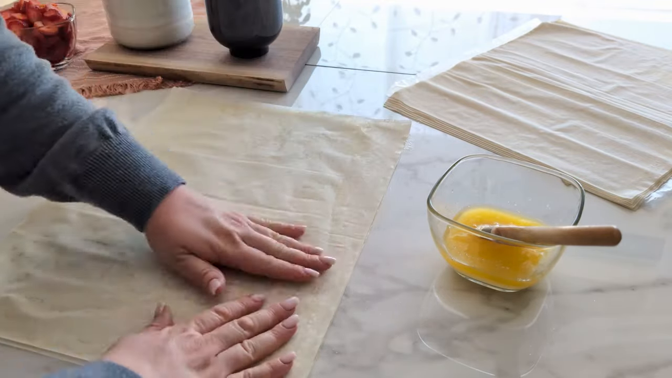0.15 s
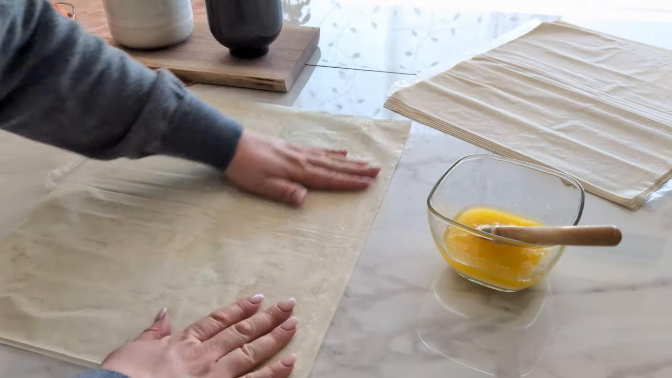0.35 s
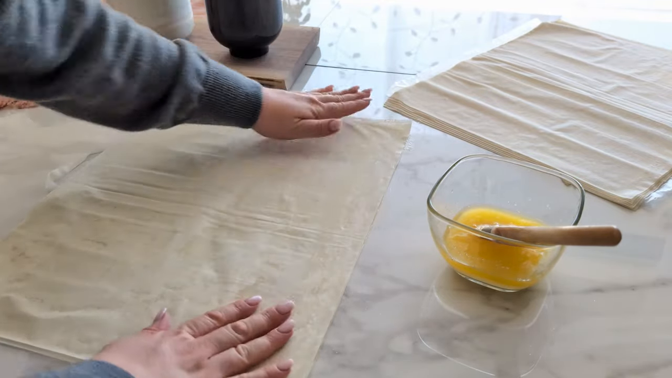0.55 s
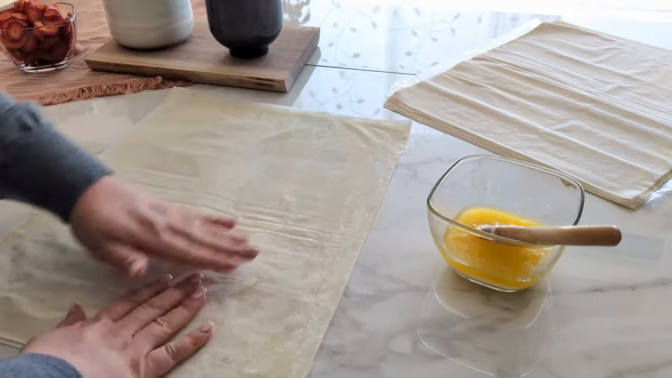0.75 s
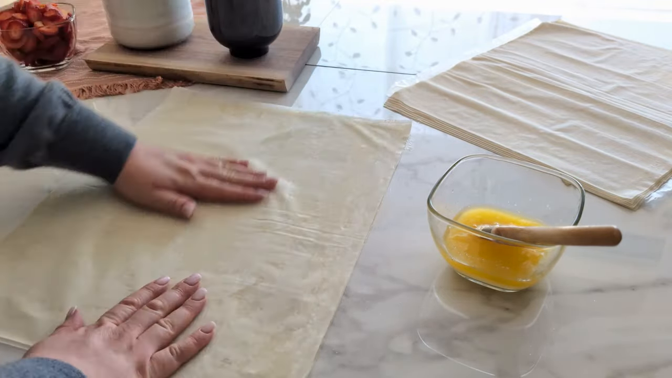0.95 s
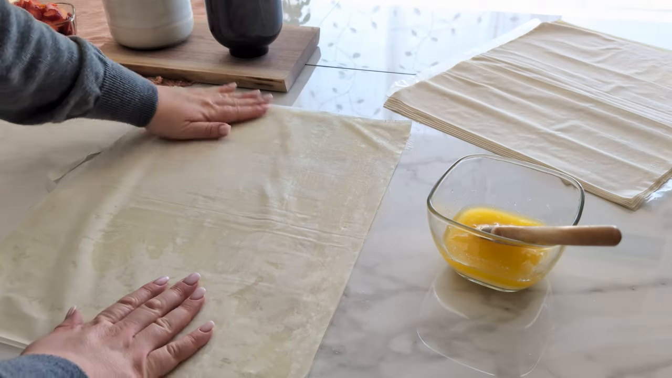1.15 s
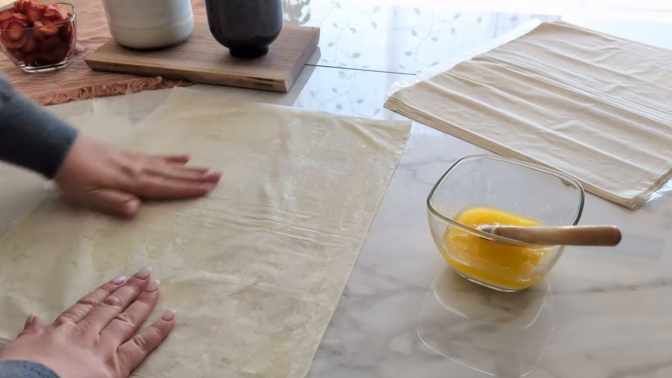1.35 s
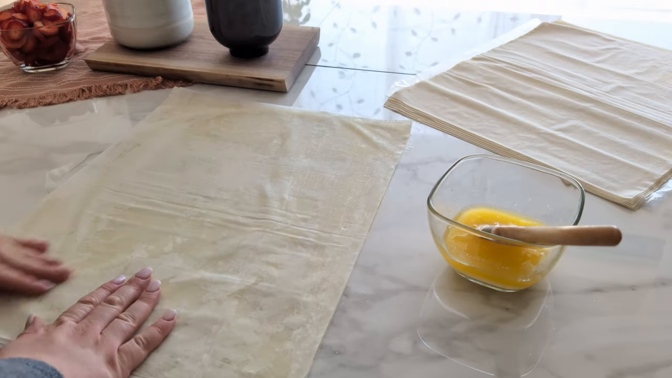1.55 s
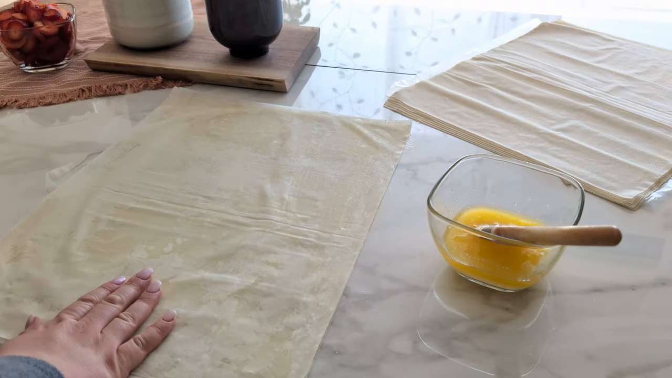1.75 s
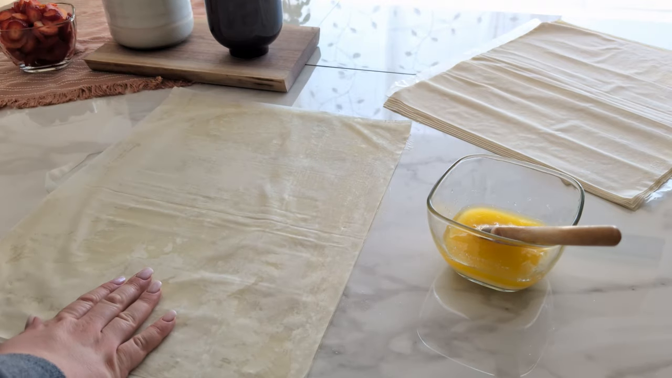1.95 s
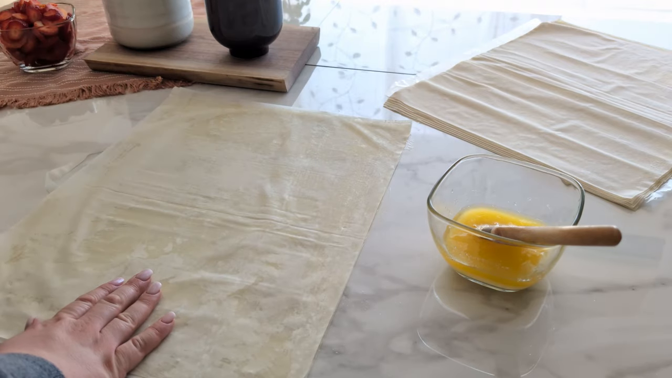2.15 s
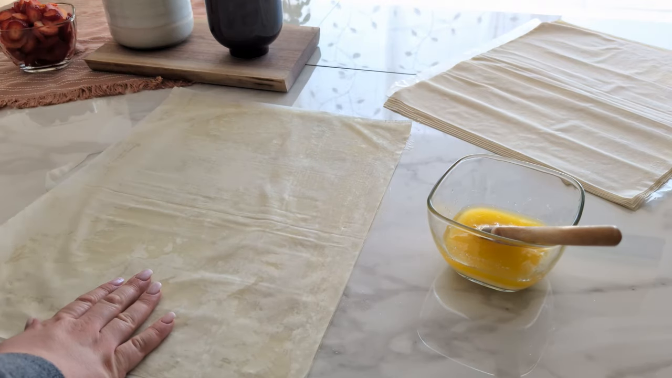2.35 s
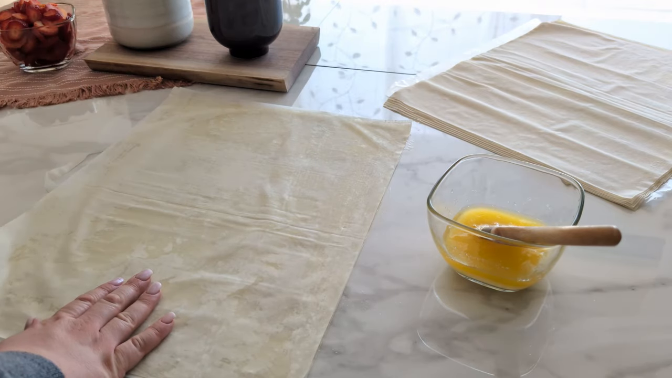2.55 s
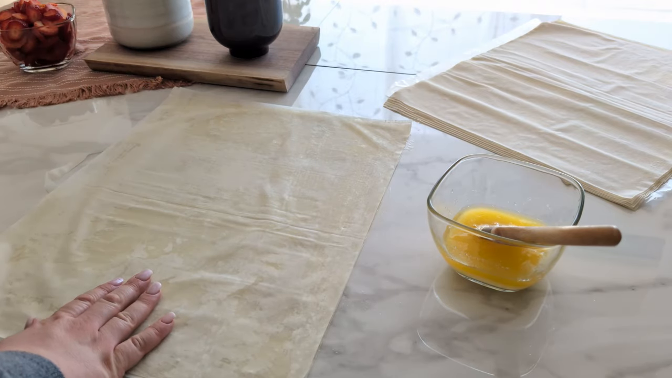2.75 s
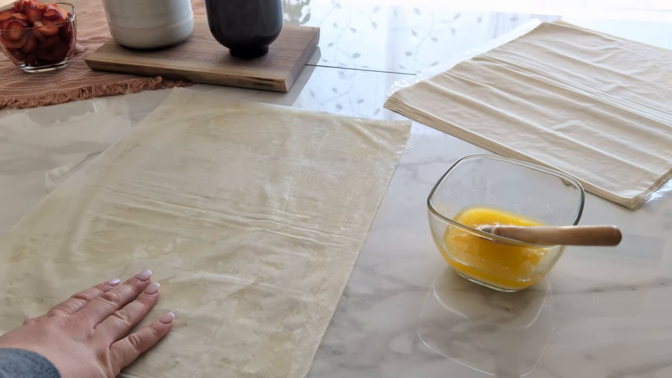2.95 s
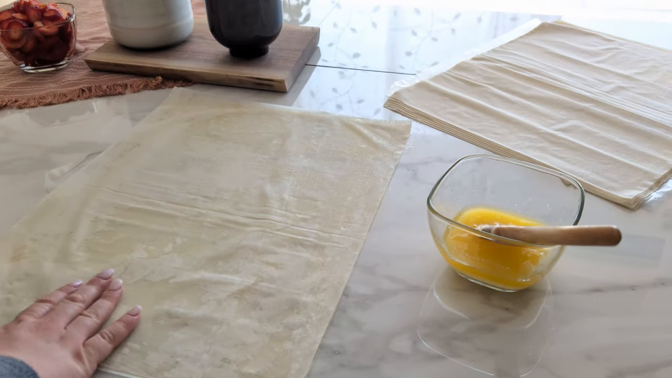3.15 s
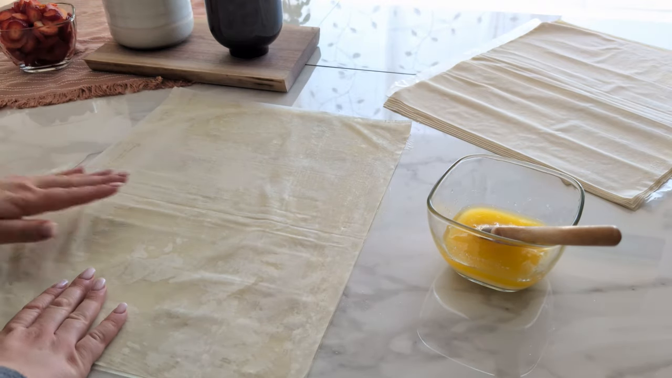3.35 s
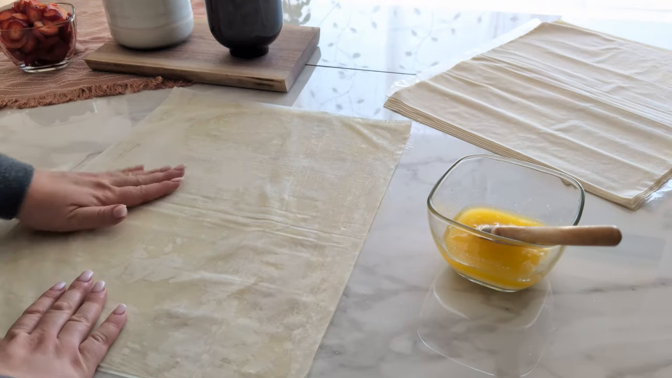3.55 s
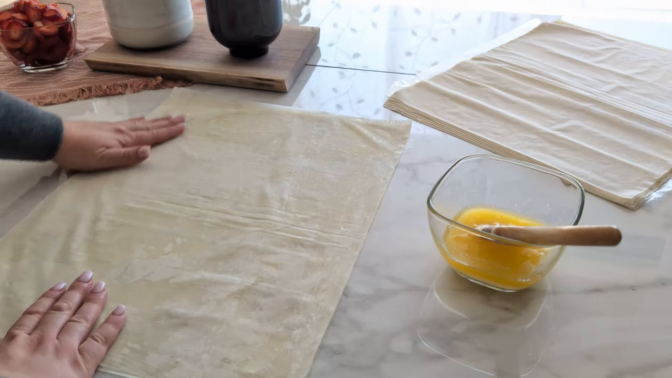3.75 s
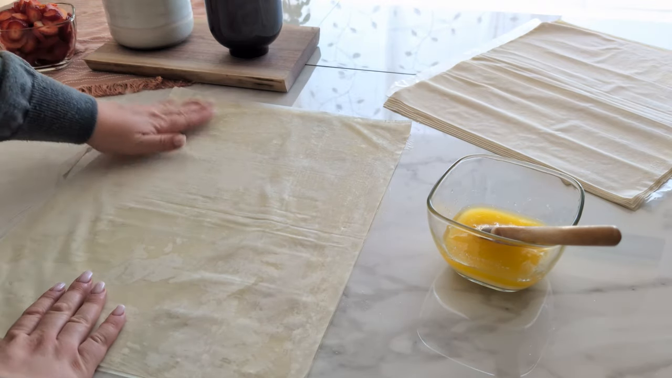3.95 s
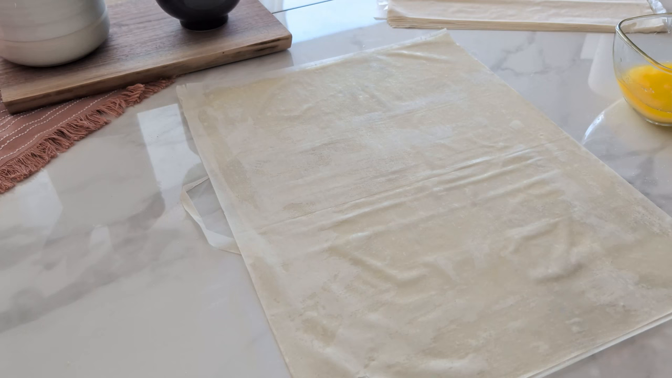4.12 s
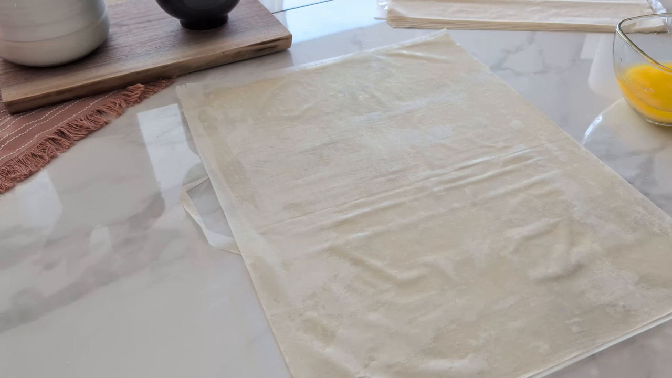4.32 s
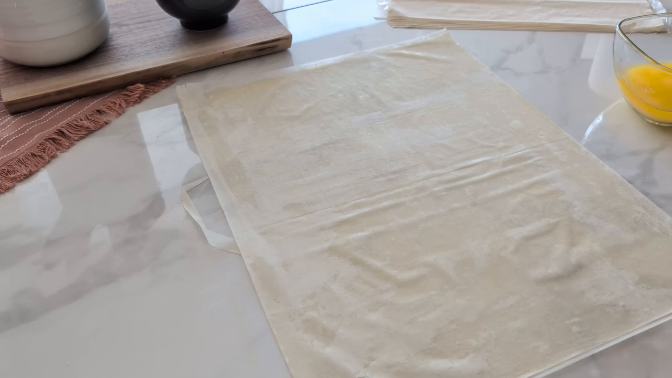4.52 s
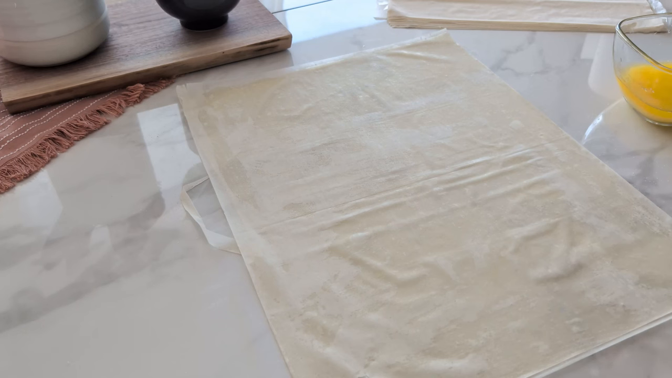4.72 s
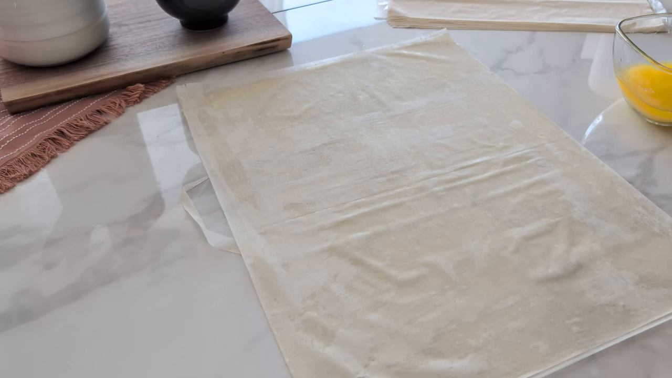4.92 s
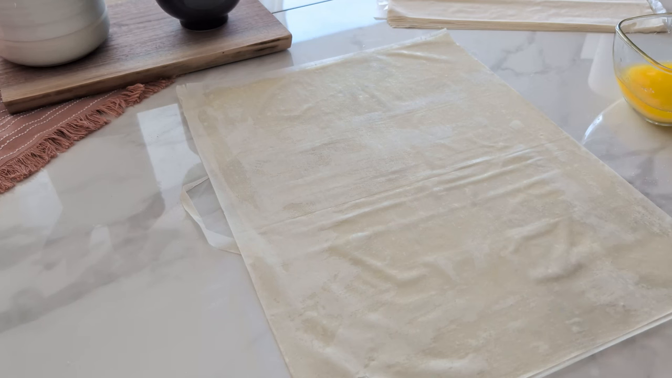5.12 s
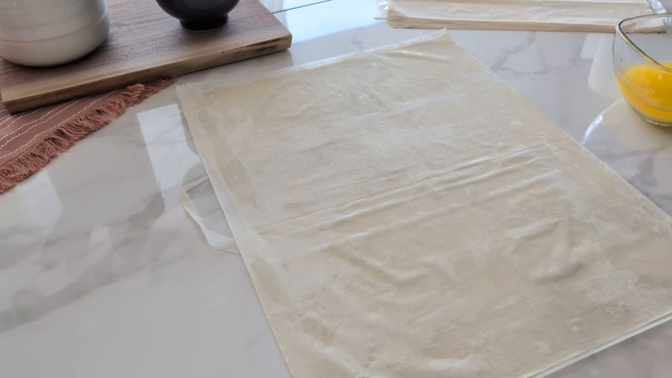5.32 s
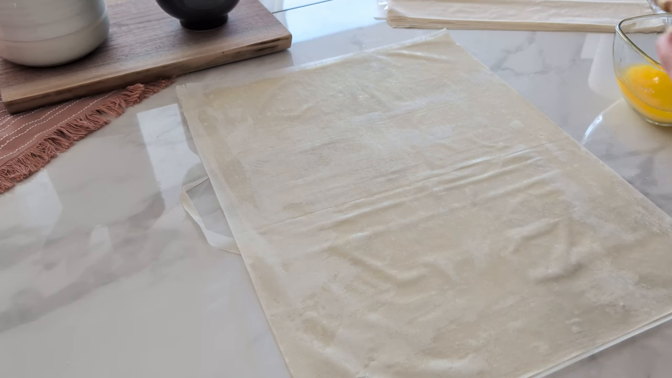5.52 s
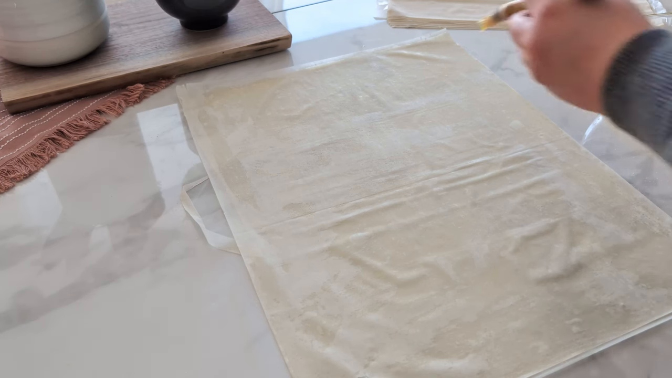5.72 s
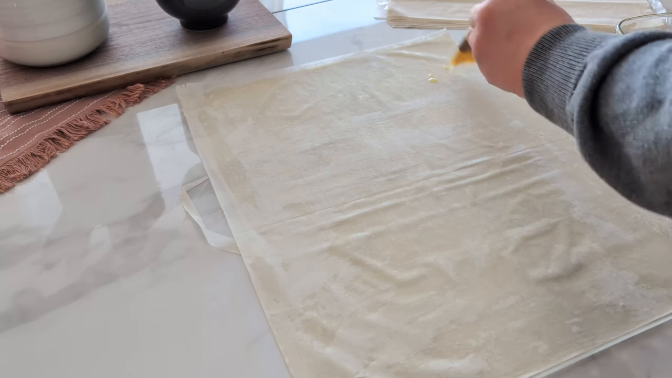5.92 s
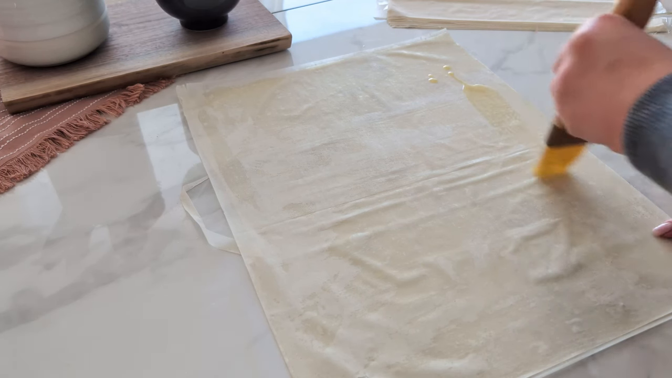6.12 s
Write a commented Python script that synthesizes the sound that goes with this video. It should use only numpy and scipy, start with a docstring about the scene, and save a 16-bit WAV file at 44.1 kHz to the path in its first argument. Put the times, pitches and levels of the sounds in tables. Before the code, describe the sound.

A palm makes soft dry hissing slides over a thin pastry sheet in a quiet kitchen; a distant door thuds, then thick liquid gurgles.

```python
"""Palm on pastry, then a butter brush

A palm smooths a thin pastry sheet on a stone counter in a quiet kitchen, and the sheet settles.
A door thuds far away: a resonant boom and a clatter, both of decaying noise.
After a cut a brush is lifted from a glass bowl of melted butter and makes a first stroke: rising rings
gurgle and bowl modes tick. Slides, settling and faint butter spray are bursts of hiss in two bands.
A low rumble, mains hum and an outdoor wash lie under everything."""
import sys
import numpy as np
from scipy import signal
from scipy.io import wavfile
from scipy.ndimage import uniform_filter1d

SR = 44100
rng = np.random.default_rng(int(sys.argv[2]) if len(sys.argv) > 2 else 0)


def to_wav(s):
    """Save 16-bit WAV."""
    ch = np.atleast_2d(s).T  # columns
    pcm = np.round(np.clip(ch, -1, 1) * 32767)  # PCM
    wavfile.write(sys.argv[1], SR, pcm.astype(np.int16))


N = 276948


def gain_of(db):
    """Decibels to gain."""
    return 10 ** (np.asarray(db) / 20)


def evened(x):
    """Scales to rms 1."""
    return x / np.sqrt(np.mean(x ** 2) + 1e-20)


def read(points, hz):
    """Reads a table over log frequency."""
    f, value = np.transpose(points)
    return np.interp(np.log(hz + 1), np.log(f + 1), value)


def colour(points):
    """A spectrum table as a function of frequency."""
    return lambda hz: read(points, hz)


def sides(pan_db):
    """Left and right gain."""
    return gain_of([pan_db / 2, -pan_db / 2])


def played(level_rows, sound):
    """A sound under a level curve, silent outside it."""
    time_s, level_db = np.transpose(level_rows)
    at = np.arange(round(time_s[0] * SR), min(round(time_s[-1] * SR), N))
    out = np.zeros((2, N))
    out[:, at] = gain_of(np.interp(at / SR, time_s, level_db)) * sound[:, at]
    return out


# Left-right likeness of noise: freq_hz, correlation [-1 to 1]
CHANNEL_LIKENESS = [(60, 0.9), (150, 0.97), (380, 0.69), (950, -0.29), (2380, -0.031), (5980, -0.045),
                    (15000, 0.098)]


def noise(spectrum_db, patchy_db, flicker_db, ripple_db, size, count=N):
    """Two-channel noise with drifting patches, a common flicker and the fixed ripple of room modes."""
    frames, hz = 4 * count // size + 5, np.fft.rfftfreq(size, 1 / SR)
    a, b, c, d, patches = rng.standard_normal((frames, len(hz), 5)).T
    patches = uniform_filter1d(patches, size=size // 64, axis=0)  # over frequency
    patches = evened(uniform_filter1d(patches, size=16384 // size, axis=1))  # over time
    flicker = evened(uniform_filter1d(rng.standard_normal(frames), size=3))
    ripple = rng.standard_normal((len(hz), 1))
    same = np.clip(read(CHANNEL_LIKENESS, hz), -1, 1)[:, None]
    left = a + 1j * b
    right = same * left + np.sqrt(1 - same ** 2) * (c + 1j * d)
    level_db = spectrum_db(hz)[:, None] + patchy_db * patches + flicker_db * flicker + ripple_db * ripple
    z = np.array([left, right]) * gain_of(level_db)
    return evened(signal.istft(z, nperseg=size, noverlap=3 * size // 4)[1][:, :count])


# Rumble spectrum: freq_hz, density_db [dB per Hz, relative]
RUMBLE_SPECTRUM = [(21, -40), (35, -13.5), (48, -3), (70, 0.5), (97, -5), (113, -28), (130, -8.5),
                   (160, -17.5), (210, -57), (350, -120)]
# Rumble level: time_s, level_db [rms]
RUMBLE_CURVE = [(0.0, -52.5), (1.0, -53), (3.0, -54), (4.11, -54), (5.9, -53), (6.28, -53)]


def rumble():
    """Nearly steady low noise."""
    low = noise(colour(RUMBLE_SPECTRUM), patchy_db=0.37, flicker_db=-1.7, ripple_db=0.9, size=4096)
    return played(RUMBLE_CURVE, low)


# Outdoor wash spectrum before the cut: freq_hz, density_db [dB per Hz, relative]
WASH_SPECTRUM = [(59, -33.5), (100, -1), (183, -2), (233, -11), (276, -16), (426, -18), (468, -17.5),
                 (621, -24), (779, -20.5), (940, -11), (1420, -18.5), (1980, -27), (2300, -34.5),
                 (3000, -39.5), (5620, -45), (9000, -54), (11700, -85.5), (19800, -120)]
# Wash level before the cut: time_s, level_db [rms]
WASH_CURVE = [(0, -53), (2.49, -54.5), (4.16, -57.5)]
# Calmer wash spectrum after the cut: freq_hz, density_db [dB per Hz, relative]
CALM_SPECTRUM = [(59, -47), (100, -16), (154, -14.5), (233, -17.5), (403, -32), (524, -26), (598, -32),
                 (888, -30.5), (958, -30.5), (1160, -32), (2360, -41), (9000, -59.5), (11700, -108),
                 (19800, -120)]
# Wash level after the cut: time_s, level_db [rms]
CALM_CURVE = [(4.16, -59.5), (4.44, -64.5), (6.0, -70), (6.28, -63.5)]


def outdoor_wash():
    """Broad noise that fades up to the cut; a calmer one then sinks and swells near the end."""
    wash = noise(colour(WASH_SPECTRUM), patchy_db=1.0, flicker_db=-1.25, ripple_db=3.0, size=4096)
    calm = noise(colour(CALM_SPECTRUM), patchy_db=1.0, flicker_db=.4, ripple_db=2.0, size=4096)
    return played(WASH_CURVE, wash) + played(CALM_CURVE, calm)


# Mains-driven appliance: freq_hz, level_db [rms before the waver]
HUM_HARMONICS = [(59.6, -61.5), (120, -70), (180, -76.5)]


def hum():
    """Faint mains harmonics whose level wavers."""
    t = np.arange(N) / SR
    waver_db = sum(np.sin(2 * np.pi * (f * t + rng.random())) for f in np.geomspace(.3, 3, num=8))
    out = np.zeros(N)
    for hz, level_db in HUM_HARMONICS:
        tone = np.sin(2 * np.pi * (hz * t + rng.random()))
        out += np.sqrt(2) * gain_of(level_db + waver_db) * tone
    return out


def background():
    """Rumble, wash and hum together."""
    return rumble() + outdoor_wash() + hum()


# Resonances of door and walls: freq_hz, width_hz, level_db
DOOR_MODES = [(218, 57, -0.5), (399, 36, -13.5), (546, 70, -15), (736, 60, -21), (980, 103, -11.5),
              (1463, 25, -20), (1630, 35, -23), (1955, 21, -22)]


def panel_db(hz):
    """Resonances of the door and walls over a weak base that falls in the treble."""
    power = sum(gain_of(2 * db) / (1 + (2 * (hz - f) / width) ** 2) ** 2 for f, width, db in DOOR_MODES)
    return 10 * np.log10(power + gain_of(-60.5) / (1 + (hz / 2200) ** 6))


# Clatter spectrum: freq_hz, density_db [dB per Hz, relative]
CLATTER_SPECTRUM = [(1180, -21), (2000, -4), (2270, -13), (2390, -9), (5320, -5), (8320, -26), (13000, -43)]
THUD_S = 2.28
BOOM_DB, BOOM_RISE_S, BOOM_HOLD_S, BOOM_T60_S = -40, 0.036, 0.077, 0.56
CLATTER_DB, CLATTER_RISE_S, CLATTER_T60_S = -56.5, 0.019, 0.38
TAIL_DB, TAIL_T60_S = -16, 1.8  # level against boom or clatter


def door():
    """A far thud, smeared by the rooms it crosses: a held boom and a clatter, both with a long weak tail."""
    t = np.arange(SR) / SR
    boom = noise(panel_db, patchy_db=1.2, flicker_db=.8, ripple_db=1.5, size=2048, count=SR)
    clatter = noise(colour(CLATTER_SPECTRUM), patchy_db=1.5, flicker_db=.6, ripple_db=.5, size=1024, count=SR)
    tail = gain_of(TAIL_DB - 60 * t / TAIL_T60_S)
    boom_decay = gain_of(-60 * np.maximum(t - BOOM_HOLD_S, 0) / BOOM_T60_S) + tail
    boom_rise = (1 - np.exp(-t / BOOM_RISE_S)) ** 2
    clatter_decay = gain_of(-60 * t / CLATTER_T60_S) + tail
    clatter_rise = (1 - np.exp(-t / CLATTER_RISE_S)) ** 2
    boom = boom * gain_of(BOOM_DB) * boom_decay * boom_rise
    clatter = clatter * gain_of(CLATTER_DB) * clatter_decay * clatter_rise
    out = np.zeros((2, N))
    out[:, round(THUD_S * SR):][:, :SR] = boom + clatter
    return out


# Kitchen decay: freq_hz, t60_s
KITCHEN_T60 = [(300, .45), (1500, 0.71), (2600, 0.47), (4000, 0.17), (12000, 0.17)]


def kitchen(x):
    """Echo of sparse taps of random sign, one in every 20 samples, each band dying at its own speed."""
    taps = np.zeros((2, SR // 2))
    at = np.arange(200, SR // 2 - 20, 20)
    at = at + rng.integers(0, 20, (2, len(at)))
    np.put_along_axis(taps, at, rng.choice([-1., 1.], at.shape), 1)
    hz, t, z = signal.stft(taps, SR, nperseg=256)
    decay = gain_of(-60 * t / read(KITCHEN_T60, hz)[:, None])
    tail = signal.istft(z * decay, SR, nperseg=256)[1]
    return signal.fftconvolve(x, tail / np.linalg.norm(tail[0]), axes=1)[:, :N]


def ring(t, hz, t60, climb, rough):
    """A brief decaying tone, roughened by slow noise in its amplitude and phase."""
    slow = uniform_filter1d(rng.standard_normal((2, len(t))), size=90)
    slow = evened(uniform_filter1d(slow, size=90))
    swing = (1 + rough * (slow[0] + 1j * slow[1])) / np.sqrt(1 + 2 * rough ** 2)
    tone = (swing * np.exp(2j * np.pi * hz * (t + climb * t ** 2))).imag
    return tone * gain_of(-60 * t / max(t60, .004)) * (1 - np.exp(-t * hz / 0.9))


def add(out, start_s, level_db, tick_db, t, sound):
    """Puts a sound with a tick at its start somewhere about the middle."""
    tick = np.diff(rng.standard_normal(len(t) + 1)) * gain_of(tick_db) * np.exp(-t / .0012)
    place = sides(rng.normal(0, 3))[:, None]
    out[:, round(start_s * SR):][:, :len(t)] += place * gain_of(level_db) * (sound + tick)


# Air pockets bursting in the butter: start_s, level_db, pitch_hz, t60_s
AIR_POCKETS = [(4.1889, -52.5, 2080, .05), (4.213, -42.5, 1670, 0.029), (4.228, -43.5, 1680, 0.032),
               (4.2387, -47.5, 1209, 0.12), (4.273, -46.5, 1332, 0.094), (4.2893, -47.5, 1467, 0.062),
               (4.3004, -45, 1393, 0.032), (4.321, -56, 1530, 0.035), (4.336, -49, 1352, 0.06),
               (4.371, -46, 1230, 0.018), (4.379, -52, 1267, 0.043), (4.404, -52, 1320, .027),
               (4.428, -58.5, 2450, 0.12), (4.48, -51.5, 2375, 0.054), (4.6014, -67.5, 2070, 0.058),
               (4.6364, -59.5, 2600, 0.079), (4.646, -52.5, 2090, 0.11), (4.737, -50, 2760, 0.13)]
POCKET_TICK_DB = -36  # against the ring


def butter():
    """Air pockets ring at a rising pitch, the higher the rougher."""
    t, out = np.arange(4000) / SR, np.zeros((2, N))
    for start_s, level_db, hz, t60 in AIR_POCKETS:
        pocket = ring(t, hz, t60, climb=.4, rough=.42 * (hz / 2000) ** 2)
        add(out, start_s, level_db, POCKET_TICK_DB, t, pocket)
    return out


# Handle taps on the bowl: start_s, level_db, favoured_pitch_hz, tick_db [against the ring]
HANDLE_TAPS = [(4.1686, -55.5, 5440, -7), (4.182, -56, 5640, -6), (4.3015, -70, 5270, -24),
               (4.34, -70, 4260, -20), (4.381, -67.5, 7250, -7), (4.416, -78, 4150, -20),
               (4.425, -58, 4200, -16), (4.44, -65, 7300, -14), (4.467, -65.5, 4000, -12),
               (4.629, -64, 5370, -4), (4.635, -68, 6620, -24), (4.647, -68, 4020, -20),
               (4.735, -73, 4120, -4)]
# Modes of the glass bowl: freq_hz, level_db, t60_s
BOWL_MODES = [(4110, 2, 0.1), (5450, 2, 0.041), (6560, -3, 0.14), (7300, -5, 0.13)]
SPOT_DB_PER_OCTAVE = 43  # modes far from the favoured pitch stay quiet


def bowl_taps():
    """The handle taps the bowl and rings its modes, those near the favoured pitch loudest."""
    t, out = np.arange(4000) / SR, np.zeros((2, N))
    for start_s, level_db, spot_hz, tick_db in HANDLE_TAPS:
        modes = np.zeros(len(t))
        for hz, mode_db, t60 in BOWL_MODES:
            spot_db = mode_db - SPOT_DB_PER_OCTAVE * abs(np.log2(hz / spot_hz))
            modes += gain_of(spot_db) * ring(t, hz, t60, climb=0, rough=0.19 * hz / 1000)
        add(out, start_s, level_db, tick_db, t, modes)
    return out


RISE_POWER, FADE_DB_PER_S, KNEE_S = 1.96, 354.5, 0.0099


def burst_db(t, rise_s, fade_s):
    """Swell from t = 0, and a fade at one speed after fade_s."""
    swell_db = 20 * RISE_POWER * np.log10(1 - np.exp(-abs(t) / max(rise_s, .001)) + 1e-4)
    return swell_db - FADE_DB_PER_S * KNEE_S * np.logaddexp(0, (t - fade_s) / KNEE_S)


# Slides of palm or bristles, a settling sheet and faint butter spray: start_s, end_s, level_db,
# sag_db [change until the end], rise_s, lower_at_start_db, lower_at_end_db [lower hiss against the upper]
BURSTS = [(0.216, 0.577, -37.5, -6.5, 0.037, -9, -8), (0.653, 0.824, -56, 4, 0.014, -7, -6),
          (0.87, 1.202, -41, -1.5, 0.014, -4.5, -6.5), (1.259, 1.364, -50, 2, 0.022, -7, -9.5),
          (1.353, 1.51, -42.5, -1.5, 0.0085, -11.5, -9.5), (1.497, 1.728, -48, -2, 0.0078, 0.5, -6.5),
          (1.8, 2.15, -94.5, -10, 0.018, 22.5, 13), (2.6, 2.703, -80, -5, .02, -5, 4),
          (2.956, 3.02, -77.5, -3, 0.019, -4, 0), (3.083, 3.307, -65, 3, 0.068, -5, -6),
          (3.61, 3.92, -41.5, -5.5, 0.017, -11.5, -11.5), (4.082, 4.17, -50, 7.5, 0.056, -4.5, -10.5),
          (4.17, 4.167, -58.5, 4, 0.0026, 3, -5), (4.39, 4.443, -81.5, -2.5, 0.066, 27, 19),
          (4.627, 4.649, -77, 0.5, .003, 12, 6.5), (4.718, 4.822, -76.5, -6.5, 0.022, 8, 1.5),
          (6.09, 6.225, -54, 5, 0.058, -24, -19)]
# Lower hiss, as of skin dragging the sheet: freq_hz, density_db [dB per Hz, relative]
LOWER_SPECTRUM = [(1200, -18), (1800, -5.5), (2400, -6.5), (3200, -5), (4500, -1.5), (6200, -3),
                  (8000, -8.5), (10500, -19)]
# Upper hiss, as of flour grains under the skin: freq_hz, density_db [dB per Hz, relative]
UPPER_SPECTRUM = [(3500, -42), (6000, -7), (8500, -4.5), (10000, -1.5), (11500, 2), (13000, 0),
                  (14500, 1.5), (16500, -8)]
LOWER_SHARE = 0.69  # the lower hiss follows only this share of the swell and fade in dB
CUT_S = 4.16  # a burst under way is chopped off here


def hiss_bursts():
    """Slides of palm or bristles, a settling sheet and faint butter spray: bursts of hiss in two bands."""
    grain = evened(gain_of(1.6 * uniform_filter1d(rng.exponential(1, N), size=6)))  # uneven fine texture
    lower = noise(colour(LOWER_SPECTRUM), patchy_db=2.3, flicker_db=.6, ripple_db=0, size=256)
    upper = noise(colour(UPPER_SPECTRUM), patchy_db=1.5, flicker_db=.7, ripple_db=0, size=256)
    power = np.zeros((2, N))  # upper, lower
    for start_s, end_s, level_db, sag_db, rise_s, start_lower_db, end_lower_db in BURSTS:
        last = round(CUT_S * SR) if start_s < CUT_S else N
        at = np.arange(round(start_s * SR), last)[:SR]
        t = at / SR - start_s
        along = np.clip(t / max(end_s - start_s, .005), 0, 1)
        shape_db = burst_db(t, rise_s, end_s - start_s)
        held_db = level_db + sag_db * along
        lower_db = start_lower_db + (end_lower_db - start_lower_db) * along
        power[:, at] += gain_of([held_db + shape_db, held_db + lower_db + LOWER_SHARE * shape_db]) ** 2
    out = np.sqrt(power[0]) * upper + np.sqrt(power[1]) * lower
    return out * grain * sides(pan_db=0.85)[:, None]


BURST_ECHO_DB, BOWL_ECHO_DB = -16, -12


def scene():
    """Near sources with their echo over the background."""
    bursts = hiss_bursts()
    bowl = butter() + bowl_taps()
    echo = kitchen(gain_of(BURST_ECHO_DB) * bursts + gain_of(BOWL_ECHO_DB) * bowl)
    return bursts + bowl + echo + door() + background()


# Microphone hiss spectrum: freq_hz, density_db [dB per Hz, relative]
HISS_SPECTRUM = [(1000, 2.5), (8000, -4), (16000, -4)]
HISS_DB = -88  # rms
LOW_EDGE_HZ, HIGH_EDGE_HZ = 48, 15800


def record(dry):
    """Microphone hiss, a bass cut and the band limit of the recorder."""
    hiss = noise(colour(HISS_SPECTRUM), patchy_db=4.5, flicker_db=-1.6, ripple_db=-2.0, size=512)
    bass_cut = signal.butter(4, LOW_EDGE_HZ, "high", fs=SR, output="sos")
    thinned = signal.sosfilt(bass_cut, dry + gain_of(HISS_DB) * hiss)
    band_limit = signal.firwin(1023, HIGH_EDGE_HZ, window=("kaiser", 9), fs=SR)
    return signal.oaconvolve(thinned, band_limit[None], "same")


dry = scene()
out = record(dry)
to_wav(out)
```